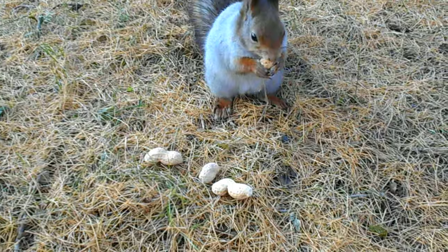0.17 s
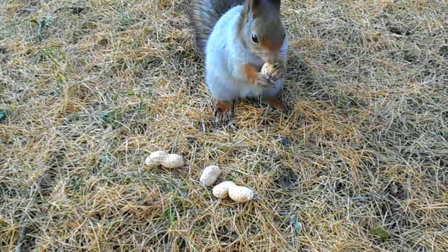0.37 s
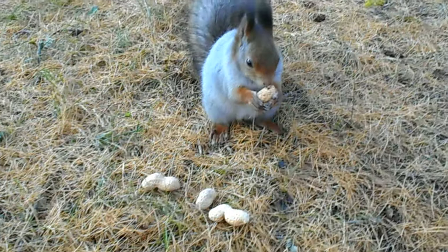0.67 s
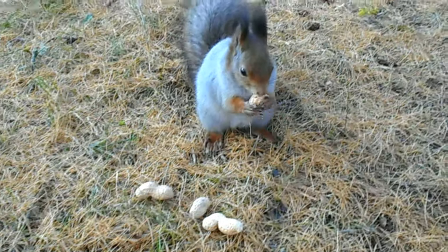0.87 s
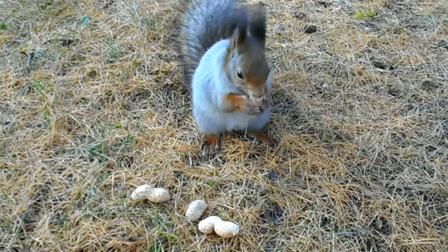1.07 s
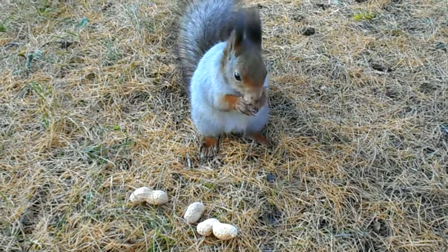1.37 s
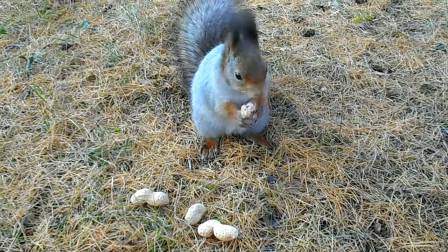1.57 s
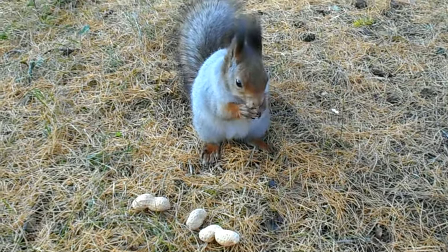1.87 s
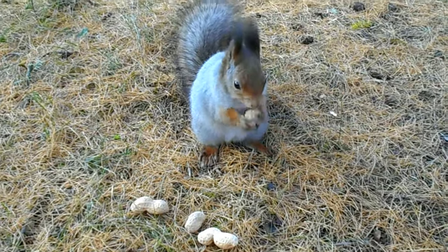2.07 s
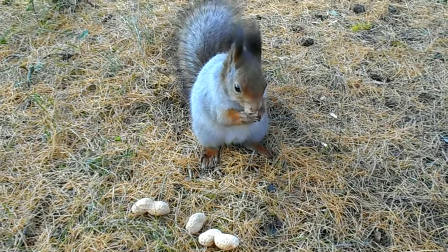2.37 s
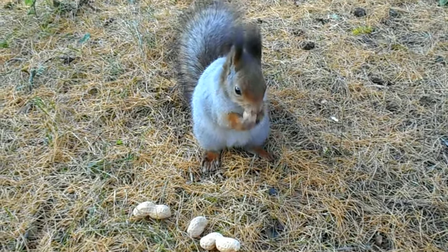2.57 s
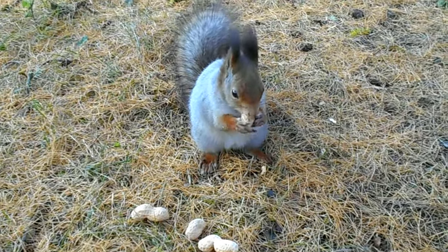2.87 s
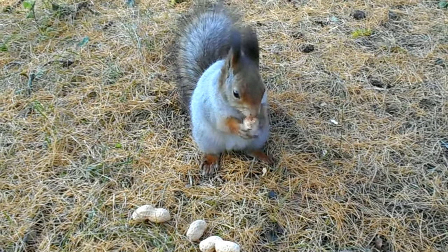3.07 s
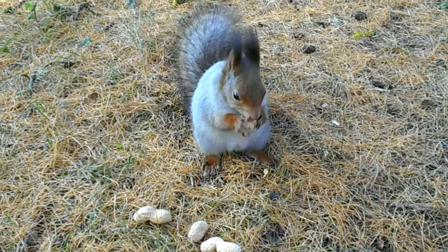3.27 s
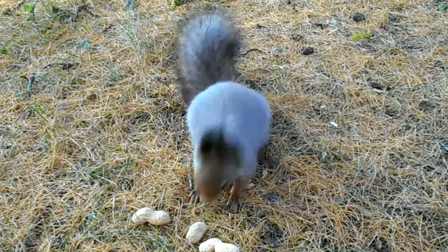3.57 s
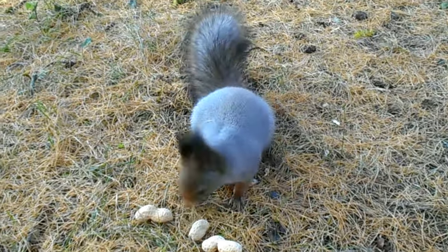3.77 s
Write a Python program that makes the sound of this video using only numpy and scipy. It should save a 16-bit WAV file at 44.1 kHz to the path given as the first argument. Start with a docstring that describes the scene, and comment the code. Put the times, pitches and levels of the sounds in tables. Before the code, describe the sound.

Close up outdoors, a squirrel cracks a peanut shell in quick bursts of crisp clicks and faint crumbly ticks. Near the end come one faint bird whistle and soft paw rustles, over a low roar of faraway traffic.

```python
"""Squirrel gnawing a peanut

A squirrel on dry grass breaks a brittle shell in clusters of tiny sharp cracks. Each fracture rings the
pod's hollow, wall and edge for a few milliseconds; splits knock lower, and faint crumbs tick in between.
Its paws rustle in puffs of grainy noise and a small bird gives one thin falling whistle. Behind it all,
distant traffic roars in bands of noise, with a hiss that swells once."""
import sys
import numpy as np
from scipy import signal
from scipy.fft import rfft, irfft, next_fast_len
from scipy.io import wavfile
from scipy.ndimage import map_coordinates

SR = 44100
rng = np.random.default_rng(int(sys.argv[2]) if len(sys.argv) > 2 else 0)


def dump(signal):
    """Clip the signal to [-1, 1] and save it as 16-bit WAV at the path in sys.argv[1]."""
    limited = np.clip(np.atleast_2d(signal).T, -1, 1)
    pcm = np.round(limited * 32767).astype(np.int16)
    wavfile.write(sys.argv[1], SR, pcm)


N = 173313
T = np.arange(N) / SR
CRACK_T = np.arange(SR // 80) / SR

# Shell cracks: (time [s], hollow level [dB], hollow pitch [Hz], wall send [dB], snap send [dB])
SHELL_CRACKS = [(0.0961, -54, 3330, -1, -10), (0.1267, -53.5, 3250, -6, -11.5), (0.1422, -66, 3370, -12, 4),
                (0.2493, -40.5, 3420, -7, -1), (0.2534, -37, 3120, -17, -3.5),
                (0.3573, -58.5, 2900, 5.5, 4), (0.3897, -53.5, 2820, -1.5, 1.5),
                (0.4977, -54.5, 2680, -3, -20), (0.5045, -50, 2780, -7, -2),
                (0.5327, -32, 2730, -3.5, -0.5), (0.5423, -51, 2570, -8, -23),
                (0.5493, -36.5, 2850, -24, -40), (1.067, -51, 2985, -22, -9), (1.18, -52.5, 3000, -7, -7),
                (1.204, -48.5, 3030, -9, -5), (1.21, -38.5, 2820, -4.5, 0), (1.244, -29, 2720, -6.5, -11),
                (1.2566, -37.5, 2940, -14, 4.5), (1.2647, -55, 3310, -5, -12),
                (1.2741, -43.5, 2960, -17, -18), (1.3088, -54, 3220, 4.5, 0), (1.3134, -40, 3020, -25, -18),
                (1.3174, -47, 2650, -17, -10), (1.3822, -47, 3130, -9, 1), (1.387, -46.5, 3560, 9.5, 6.5),
                (1.3887, -32, 2950, -8.5, -3), (1.3898, -30.5, 3250, -7.5, -2), (1.396, -47, 3060, 2, 1),
                (1.4634, -48, 3020, -7, -5), (1.5179, -35.5, 3100, -1, 2.5), (1.5208, -38, 2770, 1.5, 0.5),
                (1.5276, -59, 3160, -2, 4), (1.5431, -36.5, 2700, -3.5, -13), (1.5455, -36.5, 3400, -8, -8),
                (1.5506, -45.5, 3250, 1, -1), (1.5546, -59, 2940, 0, 11), (1.5642, -38.5, 3060, -14, -11),
                (1.8484, -42, 2860, 6.5, 2), (1.8565, -47, 3280, -9, -12), (1.9121, -45.5, 3370, -6, -10),
                (1.9174, -63, 3290, 12, 5), (1.9441, -61, 3200, 8, 7), (1.9549, -37, 3170, -1.5, -8),
                (1.9607, -38, 3190, -5, -7), (1.9705, -37, 3050, 7.5, 7), (1.9748, -47, 3270, -2, -7),
                (2.0852, -42, 3300, -9, -8), (2.101, -35, 3150, -3.5, -10), (2.106, -37.5, 3100, -27, -38),
                (2.1166, -48, 3050, -7, -22), (2.1977, -50.5, 2950, -14, -33),
                (2.4193, -31, 3150, -13, -3.5), (2.4236, -47.5, 3660, -5, 8), (2.4302, -38.5, 3470, 2, 9.5),
                (2.5272, -44, 3240, -0.5, -4), (2.5325, -34.5, 2980, -5, 1),
                (2.5404, -36.5, 3650, -3.5, -7), (2.5855, -34, 3050, -1.5, -2.5), (2.5922, -59, 3070, 6, 2),
                (2.5945, -47, 3100, -1, 9.5), (2.619, -53.5, 3480, 4.5, -2), (2.7764, -49.5, 2780, -5, -26),
                (3.0106, -46, 2800, -8, -26)]
# Dull knocks as the pod splits through: (time [s], level [dB], pitch [Hz])
POD_SPLITS = [(0.2547, -43, 1750), (1.3895, -44, 1490), (1.848, -51, 1220), (2.0852, -48, 1000),
              (2.106, -42, 1800), (2.419, -37, 1340), (2.4304, -42.5, 910)]
# Spells of nibbling: (start [s], length [s], crumb level [dB])
NIBBLE_SPELLS = [(.115, 0.01, -62), (.208, 0.01, -64.5), (.45, 0.067, -66), (.745, .04, -66),
                 (.94, 0.18, -69), (1.212, .16, -63), (1.491, .11, -62.5), (1.73, .11, -65),
                 (1.88, 0.075, -63), (2.06, .07, -60), (2.508, 0.1, -55.5)]
# Resonances of the pod's wall and of its snapping edge: (pitch [Hz], relative level [dB], t60 [s])
POD_WALL_MODES = [(4680, -1, 0.0065), (5470, 6.5, 0.002)]
EDGE_SNAP_MODES = [(7040, 4.5, 0.0018), (9350, 0.5, 0.0031), (11960, -1, 0.0026)]
# Paws on shell and grass: (peak time [s], Gaussian width [s], level [dB])
PAW_RUSTLES = [(.765, 0.011, -72), (2.32, .05, -71.5), (3.15, 0.026, -64), (3.58, 0.007, -55.5)]
# Tone of the dry grass: (frequency [Hz], relative level [dB])
GRASS_EQ = [(1000, -31), (2800, -8), (5000, -1), (7500, -4), (10000, -16)]
# The bird's falling call: (time [s], pitch [Hz], level [dB])
BIRD_CALL = [(2.91, 7750, -80), (2.925, 7350, -72), (2.945, 7240, -72), (2.98, 7140, -69),
             (3.055, 6860, -76), (3.08, 6830, -99)]
# Fader moves for the traffic's roar, tyres and hiss: (time [s], level [dB])
ROAR_FADER = [(.073, -68.5), (.16, -66.5), (.24, -59.5), (.32, -56), (.48, -53.3), (1.2, -53.5), (1.7, -53),
              (2.5, -53), (3.1, -52.6), (3.93, -52.4)]
TYRE_FADER = [(.073, -82), (.5, -62), (1.3, -60), (2.2, -55), (2.7, -55), (3.1, -52.5), (3.93, -53.5)]
HISS_FADER = [(.073, -81), (.45, -68.5), (1.0, -71), (1.6, -67.5), (2.1, -62.5), (2.35, -58), (2.7, -60),
              (3.1, -60.5), (3.4, -64.5), (3.93, -63.5)]
# Tone of the roar, tyres, hiss and far engines: (frequency [Hz], relative level [dB])
ROAR_EQ = [(25, -15), (100, -16), (140, -10), (300, -4.5), (600, -3), (920, -0.5), (1400, -5), (1750, -12),
           (2300, -25), (4000, -37), (10000, -47)]
TYRE_EQ = [(300, -22), (650, -9), (860, -3), (1000, 0), (1350, -4), (1750, -14), (2400, -30), (6000, -60)]
HISS_EQ = [(800, -19.5), (1800, 5.5), (3000, 2), (3600, -0.5), (4500, 0), (6500, -8), (8500, -13.5),
           (10000, -19.5)]
ENGINE_EQ = [(25, 0), (70, 1), (140, 1), (300, -7), (700, -30), (3000, -70)]

HOLLOW_T60_S, KNOCK_T60_S = 0.003, 0.0024
MODE_SCATTER = 0.05  # relative detune: each bite finds slightly different modes
CRUMBS_PER_S, CRUMB_HZ = 120, 2860
CRUMB_WALL_DB, CRUMB_SNAP_DB, CRUMB_SCATTER_DB = -3.5, -5.5, 3.5


def gnawing():
    """Teeth work the shell: clear cracks, duller knocks as the pod splits, and a sprinkle of crumbs."""
    out = np.zeros(N)
    for s, db, hollow_hz, wall_db, snap_db in SHELL_CRACKS:
        add(out, s, amp(db) * crack(hollow_hz, wall_db, snap_db))
    for s, db, hz in POD_SPLITS:
        knock = ring(fracture(), [(hz, 0, KNOCK_T60_S)], MODE_SCATTER)
        add(out, s, amp(db) * radiated(knock, corner_hz=500))  # the whole pod reaches lower
    for start, length, db in NIBBLE_SPELLS:
        count = max(round(length * CRUMBS_PER_S), 1)
        for place, (size, pitch, bright) in zip(rng.random(count), rng.standard_normal((count, 3))):
            hz = CRUMB_HZ * (1 + 2 * MODE_SCATTER * pitch)
            crumb = crack(hz, CRUMB_WALL_DB, CRUMB_SNAP_DB + CRUMB_SCATTER_DB * bright)
            add(out, start + place * length, amp(db + CRUMB_SCATTER_DB * size) * crumb)
    return out


def crack(hollow_hz, wall_db, snap_db, pair_detune=0.082, wall_trim_db=0.1, snap_trim_db=0.62):
    """One break rings the uneven pod's two close hollow modes, its wall and its brittle edge."""
    force = fracture()
    lower = ring(force, [(hollow_hz * (1 - pair_detune), 0, HOLLOW_T60_S)], scatter=0)
    upper = ring(force, [(hollow_hz * (1 + pair_detune), 0, HOLLOW_T60_S)], scatter=0)
    hollow = radiated(lower - upper)
    wall = radiated(ring(force, POD_WALL_MODES, MODE_SCATTER))
    snap = radiated(ring(force, EDGE_SNAP_MODES, MODE_SCATTER / 2))
    return hollow + amp(wall_db + wall_trim_db) * wall + amp(snap_db + snap_trim_db) * snap


def fracture(tear_gain=0.24, tear_s=0.00028):
    """The force of one break: a sudden release, then a dying run of tearing fibres."""
    force = tear_gain * rng.standard_normal(len(CRACK_T)) * np.exp(-CRACK_T / tear_s)
    force[0] += 1
    return force


def ring(force, modes, scatter):
    """The force rings damped modes, each with a soft attack and a random detune set by scatter."""
    response = np.zeros(len(CRACK_T))
    for hz, db, t60 in modes:
        envelope = amp(-60 * CRACK_T / t60) * (1 - np.exp(-6 * CRACK_T / t60))
        detuned_hz = hz * (1 + scatter * rng.standard_normal())
        response += amp(db) * burst(envelope * np.sin(2 * np.pi * detuned_hz * CRACK_T))
    return burst(signal.fftconvolve(force, response)[:len(CRACK_T)])


def radiated(x, corner_hz=1970):
    """The small pod radiates little low end: a high-passed, normalised hit."""
    return burst(signal.sosfilt(signal.butter(2, corner_hz, "high", fs=SR, output="sos"), x))


def ground_scatter(x, send_db=-17.5, t60_s=0.024):
    """The ground throws back a weak, short tail 1 ms behind each crack."""
    t = np.arange(SR // 10) / SR
    tail = rng.standard_normal(len(t)) * amp(-60 * t / t60_s) * (t > .001)
    return amp(send_db) * signal.fftconvolve(x, tail / np.linalg.norm(tail))[:N]


def paws():
    """Paws brush shell and dry grass in brief, grainy rustles."""
    envelope = sum(amp(db) * np.exp(-.5 * ((T - s) / width) ** 2) for s, width, db in PAW_RUSTLES)
    return envelope * grainy_noise(GRASS_EQ, grain_db=5.5, grains_per_s=500)


def bird():
    """One thin falling whistle with a slight flutter in pitch and level."""
    hz, db = curves(BIRD_CALL)
    singing = (T > BIRD_CALL[0][0]) & (T < BIRD_CALL[-1][0])
    envelope = singing * amp(db + 1.2 * wobble(90))
    phase = 2 * np.pi * np.cumsum(hz + 14 * wobble(250)) / SR
    return envelope * np.sqrt(2) * np.sin(phase)


def traffic(engine_db=-74):
    """A far roar over engine rumble; tyres of nearer cars build, and a grainy hiss swells and ebbs."""
    hiss = grainy_noise(HISS_EQ, grain_db=1.3, grains_per_s=400)
    roar = fader(ROAR_FADER, drift_db=.3, drifts_per_s=9) * noise(ROAR_EQ)
    tyres = fader(TYRE_FADER, drift_db=.5, drifts_per_s=7) * noise(TYRE_EQ)
    hiss *= fader(HISS_FADER, drift_db=.6, drifts_per_s=14)
    engines = amp(engine_db) * noise(ENGINE_EQ)
    return roar + tyres + hiss + engines


def amp(db):
    """Decibels to gain."""
    return 10 ** (np.asarray(db) / 20)


def unit(x):
    """Normalise to rms 1."""
    return x / np.sqrt(np.mean(x ** 2) + 1e-20)


def burst(x, window_s=.003):
    """Normalise a hit to the energy of rms 1 held for window_s."""
    return x * np.sqrt(window_s * SR / (np.sum(x ** 2) + 1e-20))


def curves(rows):
    """One automation curve for each column after the time."""
    times, *columns = np.transpose(rows)
    return [np.interp(T, times, column) for column in columns]


def wobble(rate):
    """A smooth random curve with rate knots a second."""
    return map_coordinates(rng.standard_normal(int(N * rate / SR) + 4), [T * rate])


def fader(rows, drift_db, drifts_per_s):
    """A gain that rides (time [s], level [dB]) points with a slight random drift."""
    return amp(curves(rows)[0] + drift_db * wobble(drifts_per_s))


def filtered(x, gain):
    """Equalise x with a gain that depends on frequency."""
    size = next_fast_len(N + 8192)
    return irfft(rfft(x, size) * gain(np.fft.rfftfreq(size, 1 / SR)), size)[:N]


def noise(eq):
    """Noise of rms 1, coloured by (frequency [Hz], relative level [dB]) points."""
    hz, db = np.transpose(eq)
    white = rng.standard_normal(N)
    return unit(filtered(white, lambda f: amp(np.interp(np.log(f + 1), np.log(hz), db))))


def grainy_noise(eq, grain_db, grains_per_s):
    """Coloured noise of rms 1, roughened by a fast flicker in level."""
    return unit(noise(eq) * amp(grain_db * wobble(grains_per_s)))


def add(track, s, sound):
    """Mix a sound into the track at s seconds."""
    part = track[max(round(s * SR), 0):][:len(sound)]
    part += sound[:len(part)]


def scene():
    """The mono mix: squirrel up close, bird and traffic far behind."""
    background = traffic() + bird()
    shell = gnawing()
    return (shell + ground_scatter(shell) + paws() + background)[None]


def record(dry, start_s=.073, top_hz=10200, shelf_db=-29, shelf_top_hz=12400):
    """The sound cuts in after a moment; a steep high cut leaves a faint shelf just above its edge."""
    def high_cut(hz):
        passband = 1 / np.sqrt(1 + (hz / top_hz) ** 110)
        shelf = amp(shelf_db) / np.sqrt(1 + (hz / shelf_top_hz) ** 110)
        return passband + shelf
    return filtered(dry[0] * (T > start_s), high_cut)[None]


dry = scene()
out = record(dry)
dump(out)
```